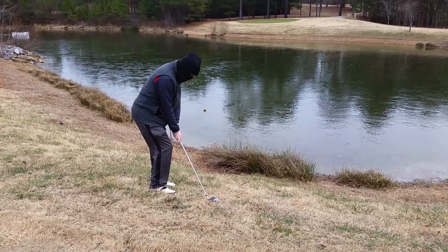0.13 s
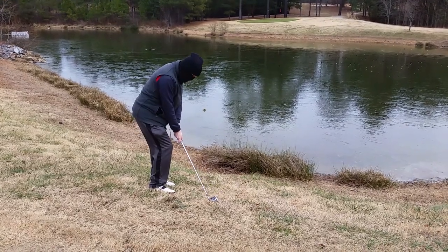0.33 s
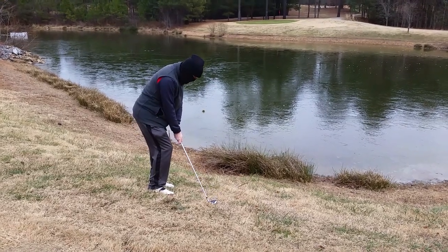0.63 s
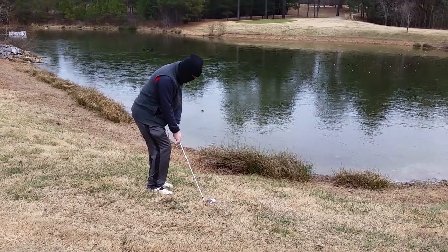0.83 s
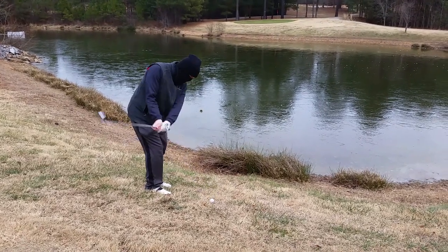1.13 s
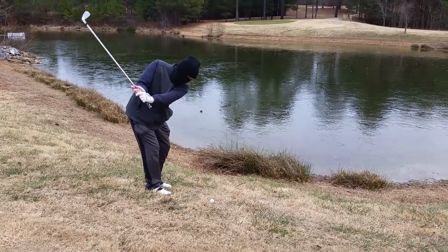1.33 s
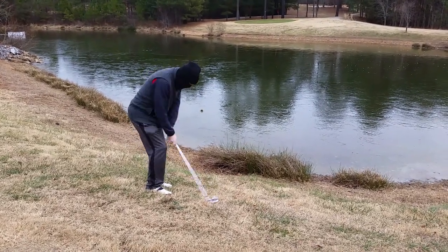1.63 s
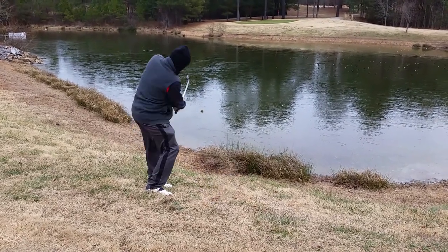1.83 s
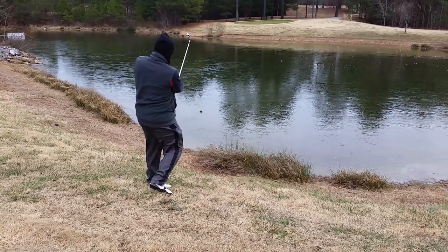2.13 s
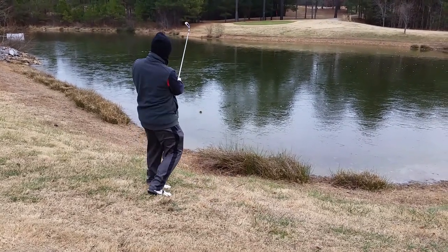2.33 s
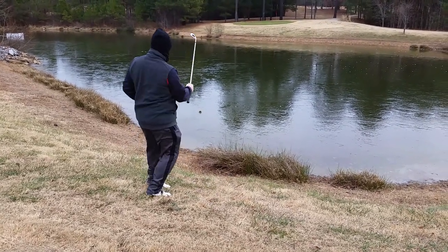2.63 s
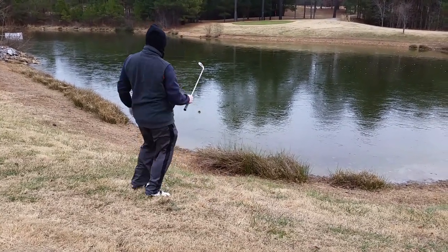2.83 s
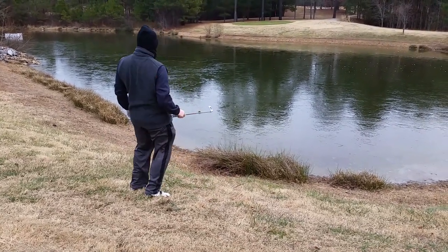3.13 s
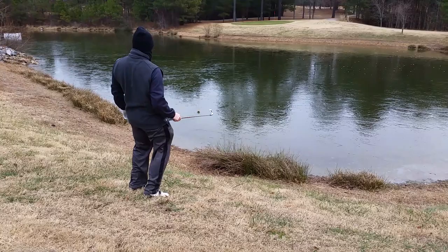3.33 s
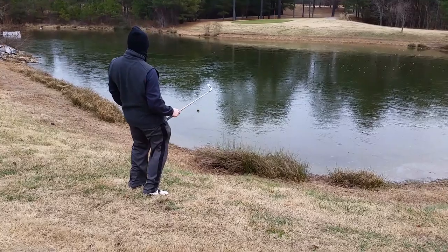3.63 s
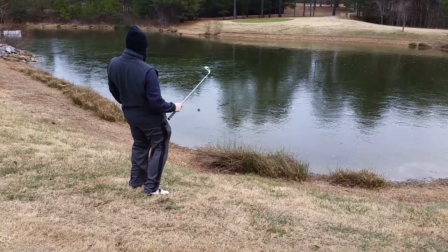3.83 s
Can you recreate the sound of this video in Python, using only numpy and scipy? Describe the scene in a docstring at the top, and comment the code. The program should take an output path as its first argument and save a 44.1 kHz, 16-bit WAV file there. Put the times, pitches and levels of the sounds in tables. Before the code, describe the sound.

Crisp golf chip shot with a turf scuff and softer hollow smack, wind buffeting the microphone

```python
"""On a dry grassy bank by a pond, a golfer chips a ball in gusty wind, a few metres from two microphone ports.
The club's click is a pressure swing, damped sine bursts and ringing modes, followed by decaying turf noise.
The ball smacks down as short tone bursts with noise, and the banks answer with diffuse decaying noise.
Grass and clothes rustle as enveloped noise; separate coloured noise buffets each port.
A wash of open air, a breeze, a thin hiss and a distant murmur lie beneath."""
import sys
import numpy as np
from scipy import signal
from scipy.fft import rfft, irfft
from scipy.io import wavfile
from scipy.ndimage import uniform_filter1d

SR = 44100
rng = np.random.default_rng(int(sys.argv[2]) if len(sys.argv) > 2 else 0)


def to_wav(s):
    """Save 16-bit WAV."""
    ch = np.atleast_2d(s).T  # columns
    pcm = np.round(np.clip(ch, -1, 1) * 32767)  # PCM
    wavfile.write(sys.argv[1], SR, pcm.astype(np.int16))


N = 176400
T = np.arange(N) / SR  # time in seconds
STRIKE_S = 1.76805

# Colour of moving air, in the breeze and the downswing: frequency_hz, relative_db
BREEZE_COLOUR = [(1800, -4), (2500, -3), (6500, -15), (16000, -32)]


def undb(db):
    """Amplitude ratio: 20 dB is a factor of ten."""
    return 10 ** (np.asarray(db) / 20)


def curve(rows):
    """Piecewise-linear interpolation of (time, value) rows."""
    return np.interp(T, *np.array(rows).T)


def noise(spectrum):
    """Spectral shaping: white noise is weighted by frequency, then scaled to unit RMS."""
    hz, db = np.array(spectrum).T
    f = np.arange(N // 2 + 1) * SR / N + 1e-3
    gain = undb(np.interp(np.log(f), np.log(hz), db))
    gain = gain * np.minimum(f / hz[0], 1) ** 2  # falls away below the first row
    x = irfft(rfft(rng.standard_normal(N)) * gain, N)
    return x / x.std()


def pan(pan_db):
    """Interchannel level difference: gains for a left-minus-right level."""
    return undb(np.array([[pan_db], [-pan_db]]) / 2)


def wide(spectrum, shared, pan_db):
    """Partial coherence: a shared fraction of the noise power is common to both channels."""
    common = np.sqrt(shared) * noise(spectrum)
    separate = np.sqrt(1 - shared) * np.array([noise(spectrum), noise(spectrum)])
    return (common + separate) * pan(pan_db)


def walk(rate):
    """Slow random modulation: held random values, drawn at a rate in Hz, are smoothed to unit spread."""
    k = max(int(SR / rate), 2)
    steps = np.repeat(rng.standard_normal(N // k + 1), k)
    x = uniform_filter1d(uniform_filter1d(steps, k), k)[:N]
    return x / x.std()


def burst(start, rise, t60):
    """Exponential energy loss after a rounded attack: the decay takes t60 seconds to fall by 60 dB."""
    age = np.maximum(T - start, 0)
    return (1 - np.exp(-(age / rise) ** 2)) * np.exp(-np.log(1000) * age / t60)


def swell(at, half):
    """Gaussian envelope, down to 1/e at half seconds either side of its centre."""
    return np.exp(-((T - at) / half) ** 2)


def swing(at, width):
    """Bipolar pressure pulse: down, then up, with unit peaks one width either side of its centre."""
    u = (T - at) / width
    return u * np.exp((1 - u ** 2) / 2)


def impact():
    """Impulsive excitation: contact makes a pressure swing, a damped crack and a modal ring of the club head."""
    # Damped crack of ball on face: frequency_hz, left_db, right_db, half_length_s
    crack_rows = [(9650, -18, -10.5, 0.00065), (10700, -23, -20.5, 0.00076), (12840, -18, -18.5, .00035),
                  (14400, -28.5, -33.5, .0003), (15600, -26, -22, .0004)]
    # Ringing modes of the club head: frequency_hz, left_db, right_db, t60_s
    face_modes = [(1082, -44.5, -39, 0.031), (1510, -53.5, -42.5, 0.051), (1830, -43, -28, 0.01556),
                  (3280, -41, -48, .006), (3840, -37, -56.5, 0.011), (6340, -48.5, -43, .007),
                  (7850, -42, -38, 0.0052)]
    contact_s, push_db = 0.00015, -21.5
    edge_s, edge_db, edge_pan_db = .00003, -30.5, 6.5  # sharp edge of first contact
    ground_delay_s, ground_left_db, ground_right_db = 0.0012, -21, -6  # levels relative to the push
    port_lag_s, crack_delay_s, face_rise_s = .00002, .0002, 0.00018

    start = STRIKE_S + np.array([[port_lag_s], [0]])  # later at the left port
    age = T - start
    direct = swing(start, contact_s)
    # The turf mirrors the broad swing but not the sharp edge.
    ground = undb([[ground_left_db], [ground_right_db]]) * swing(start + ground_delay_s, contact_s)
    push = undb(push_db) * (direct + ground)
    edge = undb(edge_db) * pan(edge_pan_db) * swing(start, edge_s)
    crack = sum(undb([[left], [right]]) * np.sin(2 * np.pi * hz * age)
                * np.exp(-((age - crack_delay_s) / length) ** 2)
                for hz, left, right, length in crack_rows)
    ring = sum(undb([[left], [right]]) * np.sin(2 * np.pi * hz * age) * burst(start, face_rise_s, t60)
               for hz, left, right, t60 in face_modes)
    return push + edge + crack + ring


def turf():
    """Granular scattering: scuffed and flying turf is decaying noise, the flying part broken into patches."""
    # Colour of the club scuffing through grass: frequency_hz, relative_db
    scuff_colour = [(400, -8), (750, 2), (1200, -2), (1850, 2), (2250, -17), (2700, -27), (4000, -35)]
    # Colour of the turf thrown up: frequency_hz, relative_db
    turf_colour = [(300, 3.5), (1000, -11), (1800, -6), (2800, -15.5), (5000, -17), (8500, -8),
                   (10000, 12.5), (11500, 1), (15000, 3.5), (16500, -10)]
    scuff_db, scuff_t60_s, scuff_delay_s = -37.5, 0.02, .006
    turf_db, turf_t60_s, patchy_db, grain_rate_hz = -45, 0.165, 4, 530

    scuff = wide(scuff_colour, shared=.8, pan_db=-6.0) * burst(STRIKE_S + scuff_delay_s, .002, scuff_t60_s)
    flying = wide(turf_colour, shared=0.46, pan_db=-0.5) * burst(STRIKE_S, 0.00073, turf_t60_s)
    patches = undb(patchy_db * walk(grain_rate_hz))
    return undb(scuff_db) * scuff + undb(turf_db) * flying * patches


def landing():
    """Short-lived resonance: two hollow smacks are brief tones; a bright tick and a thud join the second."""
    # Smacks of the ball: centre_s, level_db, half_length_s
    smack_rows = [(2.0572, -31.5, 0.0013), (2.0605, -34, 0.0011)]
    # Colour of the bright tick: frequency_hz, relative_db
    tick_colour = [(3300, -11), (5000, -22), (8500, -36), (9800, 15.5), (11000, -7), (13000, -7),
                   (15300, 2)]
    # Colour of the low thud: frequency_hz, relative_db
    thud_colour = [(450, -5), (750, -0.5), (1200, -6), (1900, -3), (2500, -30), (4000, -39)]
    smack_hz, smack_pan_db = 1835, -7
    tick_s, tick_db, tick_t60_s = 2.0609, -40, 0.0095
    thud_db, thud_t60_s = -44, 0.02

    smacks = sum(undb(db) * swell(at, half) * np.cos(2 * np.pi * smack_hz * (T - at))
                 for at, db, half in smack_rows)
    tick = undb(tick_db) * wide(tick_colour, shared=0.49, pan_db=-14) * burst(tick_s, 0.00064, tick_t60_s)
    thud = undb(thud_db) * wide(thud_colour, shared=0.94, pan_db=3) * burst(tick_s, 0.00098, thud_t60_s)
    return smacks * pan(smack_pan_db) + tick + thud


def banks():
    """Diffuse reflection: the banks scatter both blows into decaying noise, the last return the dullest."""
    # Returns from the banks: start_s, dull_db, bright_db, rise_s, t60_s
    echo_rows = [(1.855, -86, -70.5, 0.017, 0.52), (2.057, -60.5, -58.5, .004, 0.4),
                 (2.105, -66, -58.5, 0.022, 0.4), (2.18, -64.5, -72.5, 0.033, 0.58)]
    # Colours of the dull and the bright part: frequency_hz, relative_db
    dull_colour = [(500, -19), (850, 2), (1400, -1), (1900, -6.5), (2600, -52)]
    bright_colour = [(1100, -25), (1600, -3), (2050, -2), (2650, -50)]
    dull = sum(undb(db) * burst(at, rise, t60) for at, db, _, rise, t60 in echo_rows)
    bright = sum(undb(db) * burst(at, rise, t60) for at, _, db, rise, t60 in echo_rows)
    dull_part = wide(dull_colour, shared=.22, pan_db=-4.5) * dull
    bright_part = wide(bright_colour, shared=.22, pan_db=-4.5) * bright
    return dull_part + bright_part


def downswing():
    """Aerodynamic noise: the club swishes through the air just before contact."""
    swish_s, swish_db, swish_half_s = 1.725, -76, .025
    return undb(swish_db) * noise(BREEZE_COLOUR) * swell(swish_s, swish_half_s)


def grass():
    """Friction and fracture noise: grass and cloth rustle in grainy swells, and a few stalks snap."""
    # Colour of dry grass and cloth: frequency_hz, relative_db
    rustle_colour = [(2500, -28), (8500, -27), (9500, 2), (10300, 4.5), (12000, 2), (13500, 0), (14800, 8),
                     (16000, -3)]
    # Rustles of the backswing and of stepping back, before graininess: centre_s, level_db, width_s
    rustle_rows = [(0.969, -49, .026), (2.48, -78, 0.057), (2.95, -58.5, 0.068)]
    # Stalks snapping underfoot: start_s, level_db
    snap_rows = [(2.461, -66), (2.542, -65), (2.652, -56), (2.6845, -52.5), (3.6947, -51), (3.9078, -53.5)]
    snap_t60_s = .014
    swells = sum(undb(db) / (1 + ((T - at) / width) ** 2 / 2) ** 2 for at, db, width in rustle_rows)
    grains = undb(2.4 * walk(180))
    snaps = sum(undb(db) * burst(at, .0005, snap_t60_s) for at, db in snap_rows)
    return wide(rustle_colour, shared=0.19, pan_db=-1.0) * (swells * grains + snaps)


def buffets():
    """Local pressure fluctuation: eddies hit the right port, big ones as single swings, small ones in flurries."""
    # Single big eddies: centre_s, level_db, half_width_s
    buffet_rows = [(.137, -12.5, 0.003), (.204, -11, 0.0029), (.34, -9.5, 0.0043), (.782, -21.5, .0012),
                   (1.129, -18.5, 0.002), (1.685, -11.5, 0.0029), (2.965, -10, 0.0025), (3.281, -11, .0014),
                   (3.582, -11.5, 0.0028)]
    # Flurries of small eddies: centre_s, level_db, half_length_s
    flurry_rows = [(0.221, -34.5, 0.022), (0.324, -27.5, 0.028), (0.761, -34, 0.018), (1.195, -34, 0.011),
                   (1.347, -32.5, .012), (1.56, -37, .012), (1.675, -29, 0.0096), (1.725, -28.5, 0.018),
                   (1.828, -38, .014), (1.905, -44, .02), (2.219, -38.5, 0.01), (2.704, -39, 0.0087),
                   (2.865, -32.5, 0.0093), (3.083, -32.5, 0.011), (3.287, -27.5, 0.051),
                   (3.557, -29, 0.032), (3.65, -34, 0.019)]
    # Colour of a flurry: frequency_hz, relative_db
    flurry_colour = [(170, 1), (280, -1.5), (450, -15), (620, -28.5), (2000, -80)]
    slaps = sum(undb(db) * (1 - 2 * ((T - at) / half) ** 2) * swell(at, half) for at, db, half in buffet_rows)
    flurries = noise(flurry_colour) * sum(undb(db) * swell(at, half) for at, db, half in flurry_rows)
    return np.array([np.zeros(N), slaps + flurries])


def port(gust, spectrum):
    """Turbulence at one port: large eddies rumble; small ones come in bursts and grow with the gust."""
    eddy_hz, eddy_rate_hz, eddy_db = 215, 45, 3.6  # split frequency; rate and depth of the bursts
    gust_brightens, gust_ref_db = 0.25, -12  # extra dB of small eddies per dB of gust
    flutter_rate_hz, flutter_db = 35, 1.8
    db = curve(gust)
    flow = noise(spectrum)
    flow = flow / np.sqrt(uniform_filter1d(flow ** 2, size=3500))  # even out the short-time power
    low_pass = signal.butter(2, eddy_hz, fs=SR, output="sos")
    large = signal.sosfiltfilt(low_pass, flow)
    small_gain_db = eddy_db * walk(eddy_rate_hz) + gust_brightens * (db - gust_ref_db)
    small = (flow - large) * undb(small_gain_db)
    return (large + small) * undb(db + flutter_db * walk(flutter_rate_hz))


def wind():
    """Uncorrelated turbulence: the two ports are buffeted independently."""
    # Gusts at each port, before the port gain: time_s, level_db
    gust_left = [(0, -52.5), (.1, -47), (1.75, -48), (2.0, -58.5), (2.65, -61), (2.87, -41.5),
                 (3.04, -32.5), (3.14, -41), (3.25, -31.5), (3.4, -40.5), (3.97, -34.5)]
    gust_right = [(0, -47.5), (.14, -31), (.33, -26), (.55, -34.5), (.7, -35), (.77, -29), (.97, -31.5),
                  (1.04, -36.5), (1.21, -31.5), (1.43, -33.5), (1.64, -30), (1.73, -28), (1.765, -41),
                  (1.83, -35), (2.55, -48.5), (2.82, -37), (2.87, -32), (3.06, -29.5), (3.14, -36),
                  (3.28, -25), (3.57, -26.5), (3.62, -31), (3.97, -39.5)]
    # Colour of the buffeting, before small eddies are rescaled: frequency_hz, relative_db
    left_colour = [(20, -8.5), (40, -14), (70, 5.5), (110, -1.5), (160, -6.5), (230, -21.5), (330, -33.5),
                   (600, -47.5), (4000, -110)]
    right_colour = [(20, -13), (40, -6), (65, 2), (100, 2.5), (150, -2), (220, -11), (330, -20.5),
                    (480, -33.5), (650, -43), (1200, -82), (4000, -110)]
    left_db, right_db = 2, 5  # port gains
    left = undb(left_db) * port(gust_left, left_colour)
    right = undb(right_db) * port(gust_right, right_colour)
    return np.array([left, right])


def air():
    """Diffuse ambient noise: wash, breeze and hiss sink after the shot and return; a far murmur stays steady."""
    # Colour of the open air over the pond: frequency_hz, relative_db
    wash_colour = [(200, 5.5), (600, 1), (1000, -8), (1800, -16), (2400, -26), (3200, -57), (16000, -70)]
    # Course of the wash: time_s, level_db
    wash_level = [(0, -60.5), (.4, -57), (1.74, -57), (1.79, -64), (2.05, -79), (2.75, -77.5),
                  (2.95, -63.5), (3.3, -58), (3.97, -56)]
    # Course of the breeze, the upper part of the air, slower to return: time_s, level_db
    breeze_level = [(0, -83.5), (.4, -81), (1.74, -81.5), (1.91, -86), (2.07, -104), (2.84, -104),
                    (2.98, -89.5), (3.4, -80)]
    # Colour of the thin high hiss: frequency_hz, relative_db
    hiss_colour = [(7500, -43.5), (8900, -33.5), (9600, -8), (10300, 6), (11000, -3.5), (11700, -8.5),
                   (13500, -4), (16000, -6)]
    # Course of the hiss, before its flutter: time_s, level_db
    hiss_level = [(0, -68.5), (.65, -61), (.85, -63.5), (1.9, -65.5), (2.05, -75.5), (2.33, -85),
                  (2.45, -77), (2.78, -78), (3.1, -71), (3.97, -68)]
    # Colour of the distant murmur: frequency_hz, relative_db
    far_colour = [(200, 3), (600, -6), (1100, -14), (1500, -10), (1900, -4), (2300, -38), (3000, -27.5),
                  (9000, -32)]
    far_db = -79

    wash = wide(wash_colour, shared=0.15, pan_db=-3.5) * undb(curve(wash_level))
    breeze = wide(BREEZE_COLOUR, shared=0.073, pan_db=4.5) * undb(curve(breeze_level))
    hiss = wide(hiss_colour, shared=.15, pan_db=-5.5) * undb(curve(hiss_level) + 0.89 * walk(50))
    murmur = undb(far_db) * wide(far_colour, shared=0.52, pan_db=-6.5)
    return wash + breeze + hiss + murmur


def scene():
    """Linear superposition of all sources at the two ports."""
    blows = impact() + turf() + landing() + banks()
    return blows + downswing() + grass() + buffets() + wind() + air()


def record(dry):
    """Band limiting: a steep elliptic low-pass removes the top of the spectrum."""
    top_hz, ripple_db, stop_db = 16200, .2, 80
    return signal.sosfilt(signal.ellip(10, ripple_db, stop_db, top_hz, fs=SR, output="sos"), dry)


dry = scene()
out = record(dry)
to_wav(out)
```